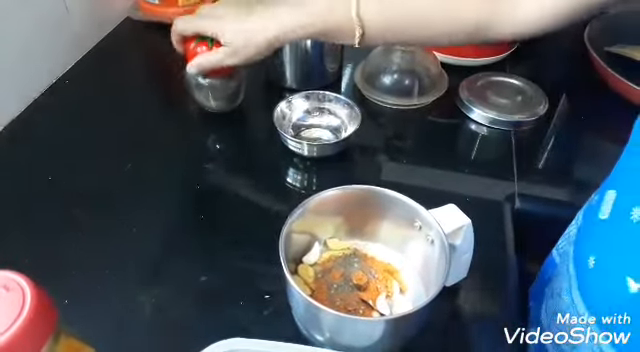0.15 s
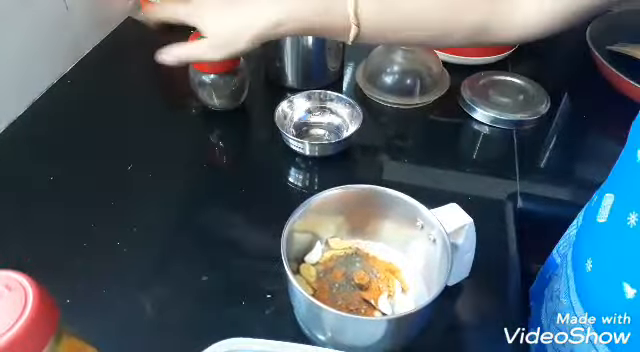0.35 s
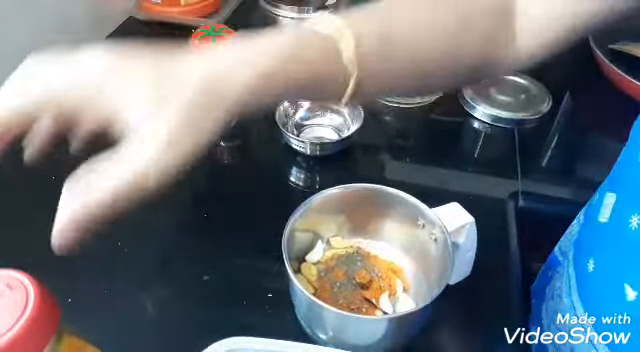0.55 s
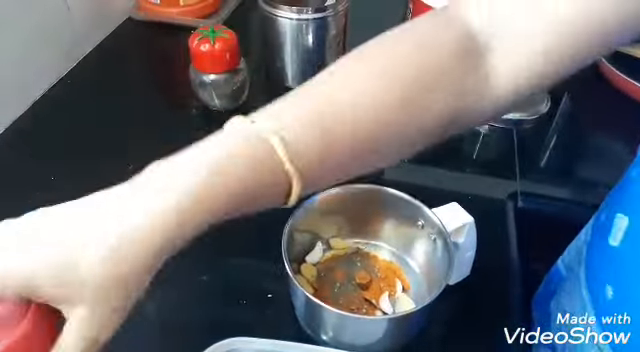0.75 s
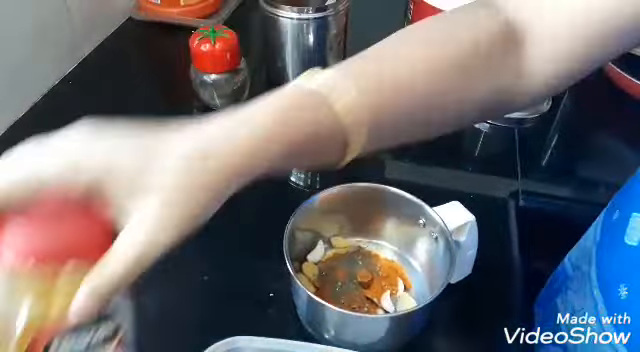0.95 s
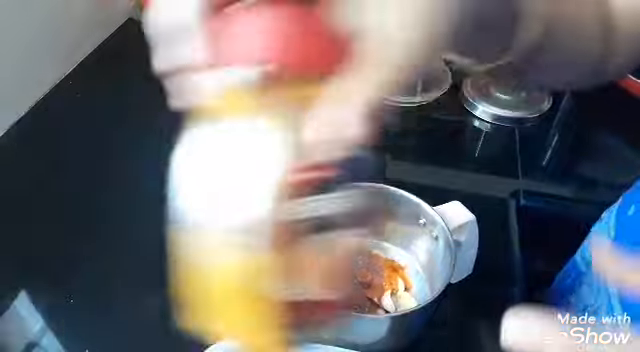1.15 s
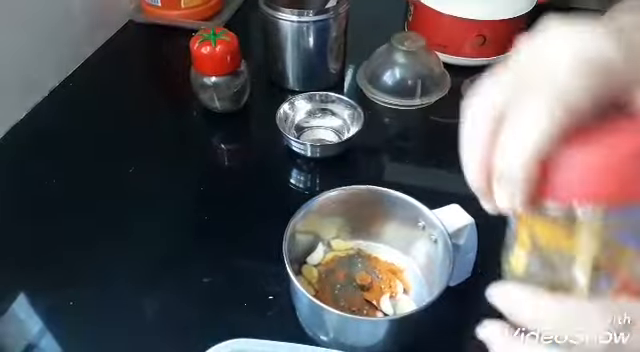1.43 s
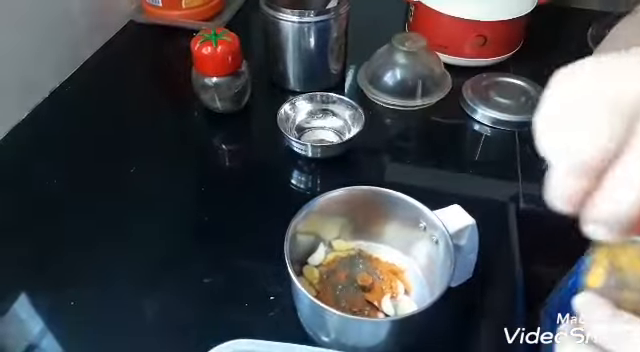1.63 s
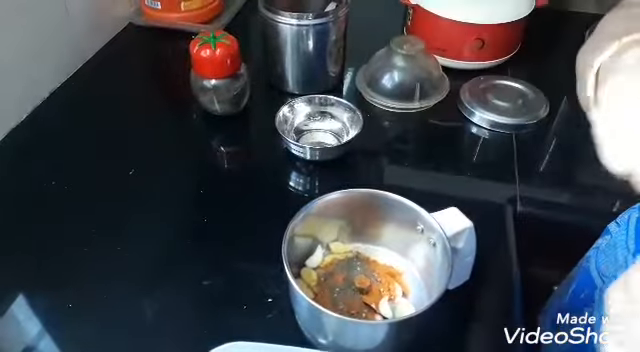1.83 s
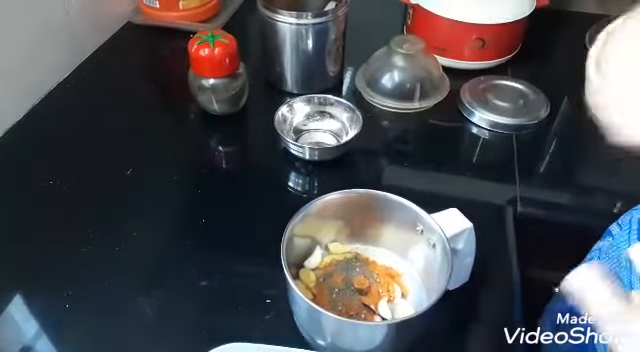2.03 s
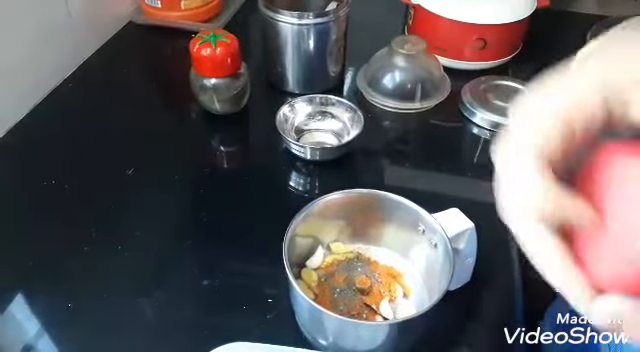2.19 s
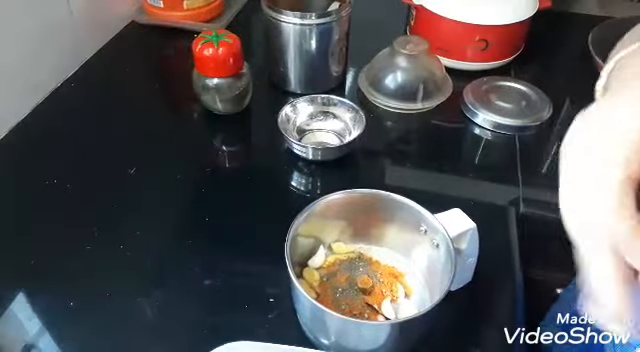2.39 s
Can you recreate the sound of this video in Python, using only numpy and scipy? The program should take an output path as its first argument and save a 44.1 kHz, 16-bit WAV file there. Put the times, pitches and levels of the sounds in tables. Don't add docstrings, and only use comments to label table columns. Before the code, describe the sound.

Glass knocks sharply onto a hard kitchen counter, followed by jar knocks, bangle clinks and a lid pop

```python
import sys
import numpy as np
from scipy import signal
from scipy.fft import rfft, irfft
from scipy.io import wavfile

SR = 44100
rng = np.random.default_rng(int(sys.argv[2]) if len(sys.argv) > 2 else 0)


def dump_mix(stems):
    frames = np.atleast_2d(stems).T
    limited = np.clip(frames, -1, 1)
    pcm = np.round(limited * 32767).astype(np.int16)
    wavfile.write(sys.argv[1], SR, pcm)


def gain_from_decibels(decibels):
    exponent = np.asarray(decibels, float) / 20
    return 10 ** exponent


N = 112454


def rms_one(x):
    return x / np.sqrt(np.mean(x ** 2) + 1e-20)


def at_hz(points, hz):
    p = np.array(points, float)
    return np.interp(np.log(np.maximum(hz, 1)), np.log(p[:, 0]), p[:, 1])


def coloured(x, spectrum):
    gain = gain_from_decibels(at_hz(spectrum, np.fft.rfftfreq(len(x), 1 / SR)))
    return irfft(rfft(x) * gain, len(x))


def drift(rate_hz):
    hop, settle = 40, 2000
    pole = np.exp(-2 * np.pi * rate_hz * hop / SR)
    noise = rng.standard_normal(N // hop + settle + 2)
    slow = signal.lfilter([1], [1, -2 * pole, pole * pole], noise)[settle:]
    return np.interp(np.arange(N) / hop, np.arange(len(slow)), rms_one(slow))


def struck(times, db, modes, spread_db, contact_hz):
    out = np.zeros(N)
    luck = rng.standard_normal((len(times), len(modes)))
    at = (np.asarray(times) * SR).astype(int)
    for k, (hz, level_db, t60) in enumerate(modes):
        clicks = np.full(N, 1e-18)
        np.add.at(clicks, at, gain_from_decibels(db + level_db + spread_db * luck[:, k]) * (-1) ** k)
        radius = gain_from_decibels(-60 / (t60 * SR))
        angle = 2 * np.pi * hz / SR
        out += signal.lfilter([0, np.sin(angle)], [1, -2 * radius * np.cos(angle), radius ** 2], clicks)
    soft = signal.butter(4, min(contact_hz, 19000), fs=SR, output="sos")
    return signal.sosfilt(soft, out)


def spray(times, db):
    rise_s, t60_s = 0.0008, 0.015
    # f/Hz, density/dB per Hz
    spray_colour = [(880, -16), (1500, -12.5), (2800, -6.5), (3690, -19.5), (4500, -23), (5660, -0.5),
                    (7030, -17.5), (9750, -8.5), (16000, -21.5)]
    clicks = np.full(N, 1e-18)
    clicks[(np.asarray(times) * SR).astype(int)] = gain_from_decibels(db)
    decay = signal.lfilter([1], [1, -gain_from_decibels(-60 / (t60_s * SR))], clicks)
    rise = np.exp(-1 / (rise_s * SR))
    burst = signal.lfilter([1 - rise], [1, -rise], decay)
    return burst * rms_one(coloured(rng.standard_normal(N), spray_colour))


def mains_hum():
    # f/Hz, level/dB rms, wobble/dB
    hum_lines = [(99.7, -64, -2.7), (169.6, -66, 6)]
    t = np.arange(N) / SR
    out = np.zeros(N)
    for hz, db, wobble_db in hum_lines:
        out += np.sqrt(2) * gain_from_decibels(db + wobble_db * drift(9.4)) * np.sin(2 * np.pi * hz * t)
    return out


def air():
    # f/Hz, density/dB per Hz
    bass_colour = [(15, -40), (70, -12.5), (130, -12), (170, 0.5), (250, -3.5), (500, -5.5), (1000, -14),
                   (1500, -22), (1900, -56)]
    treble_colour = [(880, -37), (1500, -0.5), (3450, -6), (4200, -12), (6060, -11.5), (7840, -22.5),
                     (9010, -11.5), (14300, -23.5), (16000, -24)]
    bass = rms_one(coloured(rng.standard_normal(N), bass_colour))
    treble = rms_one(coloured(rng.standard_normal(N), treble_colour))
    return gain_from_decibels(-53.5 + 2.1 * drift(3.1)) * bass + gain_from_decibels(-58.5 + 0.65 * drift(9.2)) * treble


def kitchen(x):
    first_echo_s = 0.0016
    # f/Hz, t60/s
    room_decay = [(150, 0.43), (500, 0.51), (1500, 0.42), (3000, 0.35), (6000, 0.42), (12000, 0.064)]
    t = np.arange(SR) / SR
    tail = np.zeros(SR)
    edges = 80 * 2 ** np.arange(0, 8, 0.5)
    white = rng.standard_normal((2, SR))
    for k, (low, high) in enumerate(zip(edges, edges[1:])):
        band_pass = signal.butter(2, [low, high], "band", fs=SR, output="sos")
        band = signal.sosfilt(band_pass, white[k % 2])
        tail += band * gain_from_decibels(-60 * t / at_hz(room_decay, np.sqrt(low * high)))
    tail *= np.clip(t / first_echo_s - 1, 0, 1)
    return signal.fftconvolve(x, tail / np.sqrt(np.sum(tail ** 2)))[:N]


def palm():
    grains_per_s, slip_t60_s, rub_db = 5000, 0.019, 1.5
    # t/s, bright hiss level/dB, dull hiss level/dB, drag level/dB
    rubbing = [(1.77, -82, -80, -68), (1.79, -57, -61, -51), (1.81, -51, -49.5, -44),
               (1.848, -60, -55, -43.5), (1.86, -66, -55.5, -52), (1.9, -68, -63, -52),
               (1.915, -62, -55.5, -46), (1.94, -54.5, -58.5, -52), (1.97, -52.5, -60, -57),
               (2.0, -51.5, -56, -45.5), (2.04, -54.5, -56.5, -46.5), (2.065, -66, -68, -62)]
    # t/s, level/dB, wall f/Hz
    catches = [(1.7978, -48, 2340), (1.8077, -38.5, 2970), (1.815, -49, 1830), (1.853, -42, 1590),
               (1.8861, -45, 1550), (1.9085, -39, 2110), (1.912, -46, 2900), (1.93, -41, 1590),
               (1.9544, -41, 2290), (1.995, -36, 2090), (2.011, -42, 2320), (2.05, -37, 2200),
               (2.005, -37, 2830), (2.043, -46, 2900)]
    # f/Hz, density/dB per Hz
    skin_colour = [(6500, -20), (8000, -8), (9200, 2.5), (10300, -4), (11300, -7.5), (13000, -18)]
    finger_colour = [(3000, -9.5), (4000, -8), (4600, -9), (5500, 0.5), (6500, -5), (7800, -20.5)]
    drag_colour = [(700, -31), (1200, -4), (1600, -3), (2100, 3), (2600, 5), (3100, -7), (3600, -19),
                   (5000, -38)]
    out = np.zeros(N)
    for at, db, hz in catches:
        out += struck([at], db, [(hz, 0, slip_t60_s)], 0, 6300)
    s, hiss_db, dull_db, drag_db = np.transpose(rubbing)
    layers = ((hiss_db + rub_db, skin_colour), (dull_db + rub_db, finger_colour), (drag_db - 5, drag_colour))
    for db, colour in layers:
        level_db = np.interp(np.arange(N) / SR, s, db, left=-120, right=-120)
        sizes = gain_from_decibels(3 * np.minimum(rng.exponential(1, N), 3)) * rng.choice([-1, 1], N)
        grains = (rng.random(N) < grains_per_s / SR) * sizes
        out += gain_from_decibels(level_db + 2.2 * drift(52)) * rms_one(coloured(grains, colour))
    return out


def bangles():
    bounces, chatter_s, t60_s = 6, 0.002, 0.024
    # t/s, ring level/dB, lowest mode level/dB, spray level/dB
    touches = [(.891, -53, -51, -65), (0.9, -57, -60, -64), (0.9342, -48.5, -50, -63),
               (.978, -48.5, -51, -66), (.985, -53, -60, -63), (1.072, -55.5, -53, -63),
               (1.509, -63, -60, -52), (1.513, -60, -43, -43.5), (1.537, -42, -43, -44),
               (1.546, -43, -40, -53), (1.554, -39, -61, -53), (1.5637, -42.5, -53, -55),
               (1.573, -46, -47, -54), (1.596, -40, -42, -41), (1.603, -52, -50, -52),
               (1.6177, -34.5, -40.5, -31.5), (1.6215, -44, -42, -43), (1.6245, -49, -48, -46),
               (1.63, -48, -56, -46), (1.639, -38.5, -35, -27.5), (1.64, -35, -33, -35),
               (1.6461, -33, -36, -31.5), (1.652, -39, -40, -42), (1.656, -53, -52, -47),
               (1.661, -48, -57, -46), (1.757, -52.5, -51, -66), (2.077, -35.5, -54, -43),
               (2.122, -49, -64, -42), (2.178, -38.5, -66, -41), (2.184, -51, -66, -47),
               (2.217, -48, -62, -58)]
    # f/Hz, level/dB
    bangle_modes = [(2880, -2), (3180, -4), (5400, -3), (5620, -2.5), (5820, -2.5), (6500, -13.5),
                    (7600, -17), (9250, -12), (9740, -21), (11100, -22), (12600, -11), (14100, -24),
                    (15000, -20)]
    tunings = [0.98, 0.97, 1.015]
    s, db, low_db, _ = np.repeat(touches, bounces, axis=0).T
    index = np.arange(len(s))
    late = rng.random(len(s)) ** 2 * (index % bounces > 0)
    s = s + chatter_s * late
    loss_db = 7 + 3 * late
    rings = np.zeros(N)
    for k, ratio in enumerate(tunings):
        modes = [(hz * ratio, level_db, t60_s) for hz, level_db in bangle_modes]
        mine = index // bounces % 3 == k
        rings += struck(s[mine], (db - loss_db)[mine], modes[2:], 4.1, 17500)
        rings += struck(s[mine], (low_db - loss_db - 3.5)[mine], modes[:2], 4.1, 16000)
    return rings + spray(*np.transpose(touches)[[0, 3]])


def jar():
    # t/s, wall level/dB, body f/Hz, body level/dB, body t60/s
    finger_knocks = [(0.8853, -30, 1680, -35, 0.025), (0.8879, -43, 1260, -46, 0.037),
                     (0.8891, -59, 2455, -37, 0.029), (0.97, -23, 850, -41, 0.055),
                     (0.9726, -40, 1720, -35, .025), (0.9796, -46, 488, -26, 0.02),
                     (.998, -36, 1720, -46, .03), (1.008, -46, 238, -34, 0.044),
                     (1.031, -44, 496, -37.5, 0.073), (1.975, -52, 1500, -39, 0.047),
                     (2.0051, -27.5, 216, -22.5, 0.043), (2.029, -62, 232, -27.5, 0.03),
                     (2.0425, -48, 694, -30, 0.02), (2.043, -51, 1500, -30, 0.029),
                     (2.051, -59, 337, -29.5, 0.045), (2.281, -62, 2450, -43, 0.046)]
    # f/Hz, level/dB, t60/s
    wall_modes = [(816, -4.5, 0.0083), (1232, -6, 0.02), (1680, -2.5, 0.011), (2190, -11, 0.013),
                  (2455, -19, 0.022), (3013, -25, 0.057)]
    body = np.zeros(N)
    for at, _, hz, body_db, t60 in finger_knocks:
        body += struck([at], body_db, [(hz, 0, t60)], 0, 5900)
    s, wall_db = np.transpose(finger_knocks)[:2]
    return struck(s, wall_db, wall_modes, 0.96, 3200) + body


def lid():
    # t/s, peak level/dB
    snaps = [
        (2.4556, -39),
        (2.4567, -19.5),
        (2.4587, -26),
    ]
    rim_taps = [
        (2.4625, -33.5),
        (2.4647, -33),
        (2.468, -38),
        (2.478, -44),
        (2.495, -37),
    ]
    # f/Hz, level/dB, t60/s
    lid_modes = [(1500, -2.5, 0.016), (1664, -2, 0.022), (2060, -11, 0.019), (3150, -11, 0.0043),
                 (5830, -10.5, 0.0036), (8650, -16.5, 0.0076), (10100, -19, .008)]
    rim_modes = [(1230, -5.5, 0.019), (1780, -6, .01), (2010, -1.5, 0.014), (2420, -6, .012),
                 (6150, -4.5, 0.0068)]
    s, db = np.transpose(snaps)
    snap = struck(s, db, lid_modes, 0, 12000)
    puff = spray(s, db - 17)
    return snap + puff + struck(*np.transpose(rim_taps), rim_modes, 2.5, 9000)


def shaker():
    ring_cycles, longest_t60_s = 22, 0.03
    # t/s, peak level/dB
    landings = [
        (.2269, -14),
        (.2276, -6),
        (.228, -8),
    ]
    # t/s, level/dB
    chatter = [(0.2305, -20), (0.2337, -16), (0.2354, -22), (0.2397, -13.5), (.2418, -22), (0.2457, -23),
               (.2478, -21.5), (.2515, -15.5), (.256, -27), (0.2602, -18), (0.2658, -37), (.2735, -29),
               (.2755, -16), (.2815, -21), (.2858, -27), (.293, -30)]
    # t/s, level/dB
    rocks = [
        (.353, -20),
        (.357, -19),
        (.362, -24.5),
        (0.394, -41),
        (.431, -26.5),
    ]
    # f/Hz, level/dB
    glass_modes = [(270, -17.5), (375, -16.5), (520, -20), (680, -25.5), (872, -13.5), (1120, -12),
                   (1450, -12), (1780, -9), (2050, -3), (2280, 2), (2500, -1.5), (2780, -9.5), (3150, -13),
                   (3450, -13.5), (3800, -14.5), (4200, -26)]
    # f/Hz, level/dB, t60/s
    edge_modes = [(4760, -6.5, 0.0063), (5500, -3.5, 0.0054), (6140, 2.5, 0.0067), (7020, -4.5, 0.0078),
                  (8900, -12.5, .005), (9340, -10.5, 0.0064), (10000, -15, 0.0087)]
    modes = [(hz, db, min(ring_cycles / hz, longest_t60_s)) for hz, db in glass_modes]
    s, db = np.transpose(landings)
    landing = struck(s, db + 1.66, modes, 0, 5600)
    chattering = gain_from_decibels(-2) * struck(*np.transpose(chatter), modes, 4.4, 3950)
    edge = struck(s[2:], -31, edge_modes, 0, 14000) + spray(s[2:], [-42])
    rocking = struck(*np.transpose(rocks), modes, 2.5, 2070)
    return landing + chattering + edge + rocking


def scene():
    far, near, pop, metal, skin = shaker(), jar(), lid(), bangles(), palm()
    send = gain_from_decibels(-5.5) * far + gain_from_decibels(-9.5) * near + gain_from_decibels(-13) * pop + gain_from_decibels(-10) * metal + gain_from_decibels(-11) * skin
    events = far + near + pop + metal + skin + kitchen(send)
    mic_cut = signal.butter(4, 220, "high", fs=SR, output="sos")
    mid = signal.sosfilt(mic_cut, events) + air() + mains_hum()
    return np.array([mid, mid])


def roll_off(x):
    return signal.sosfilt(signal.butter(12, 16330, fs=SR, output="sos"), x)


def record(dry):
    # f/Hz, density/dB per Hz
    side_colour = [(18, -40), (30, -6), (584, 0.5), (1250, -1), (2010, -1), (6050, -2.5), (12600, -5.5),
                   (14800, -4), (16000, -31)]
    side = gain_from_decibels(-69.5) * rms_one(coloured(rng.standard_normal(N), side_colour))
    treble_cut = signal.cheby2(12, 70, 16450, fs=SR, output="sos")
    mix = signal.sosfilt(treble_cut, dry + side * [[1], [-1]])
    return roll_off(mix)


dry = scene()
out = record(dry)
dump_mix(out)
```